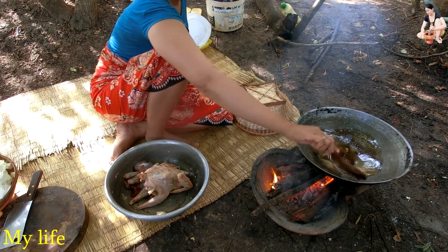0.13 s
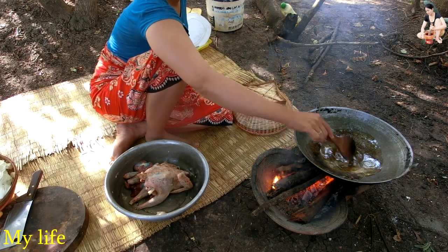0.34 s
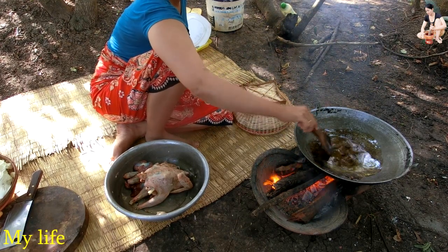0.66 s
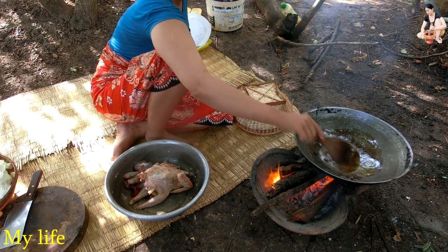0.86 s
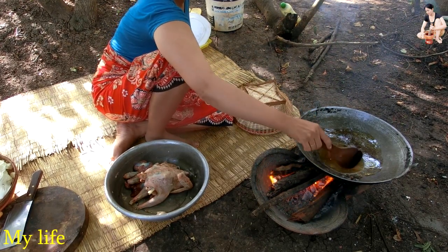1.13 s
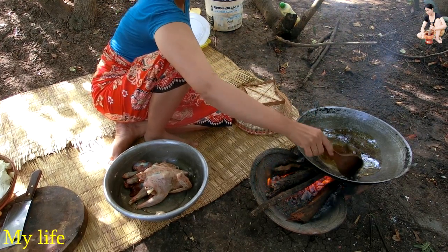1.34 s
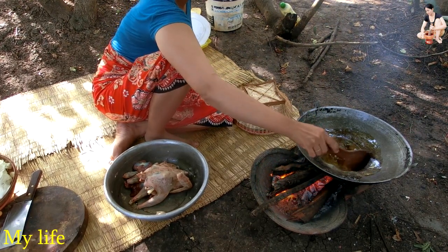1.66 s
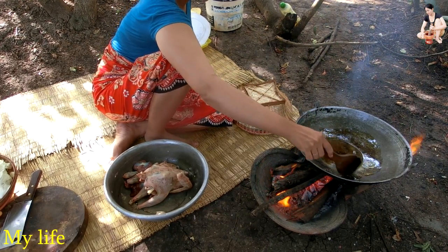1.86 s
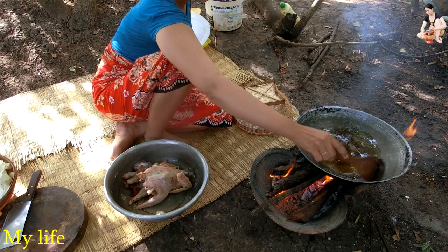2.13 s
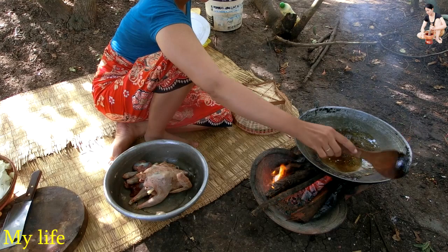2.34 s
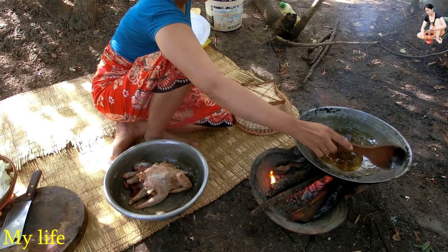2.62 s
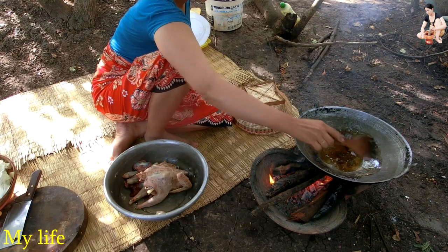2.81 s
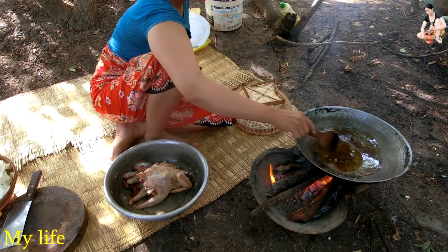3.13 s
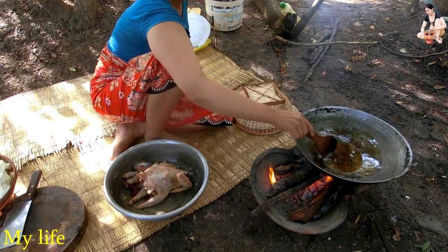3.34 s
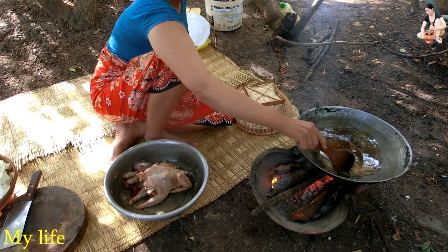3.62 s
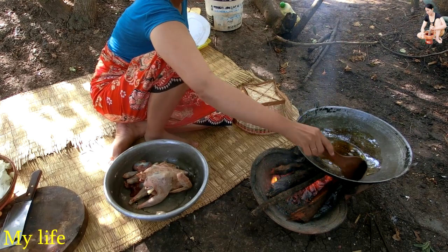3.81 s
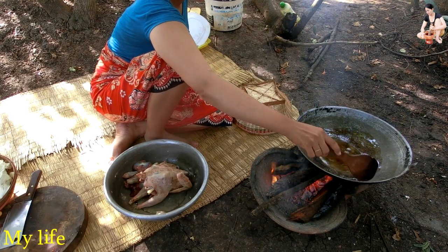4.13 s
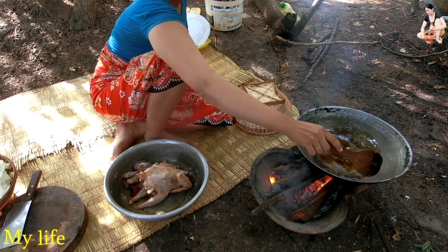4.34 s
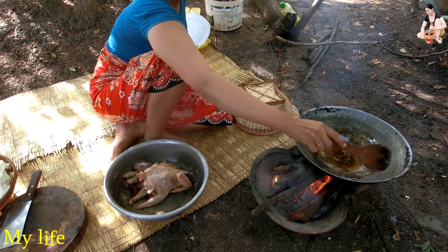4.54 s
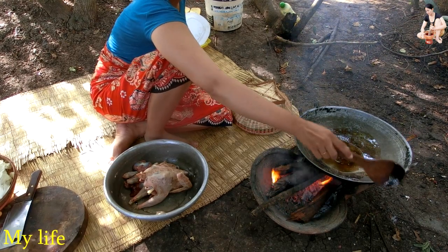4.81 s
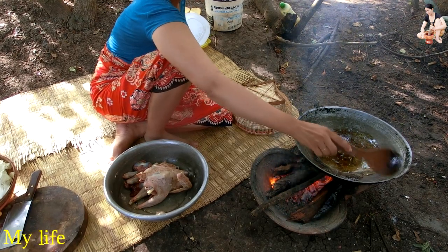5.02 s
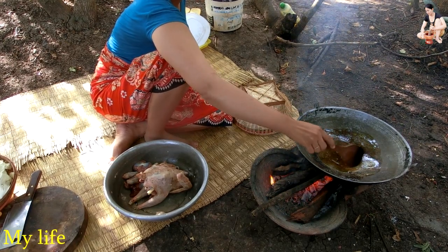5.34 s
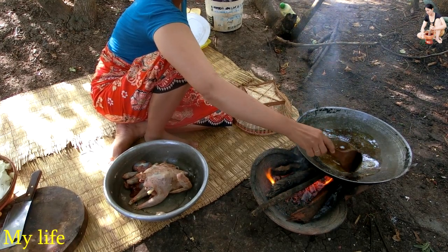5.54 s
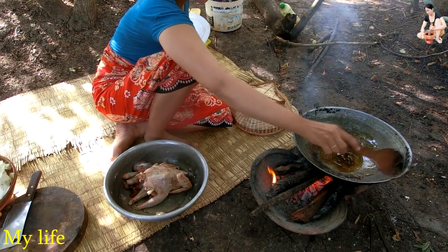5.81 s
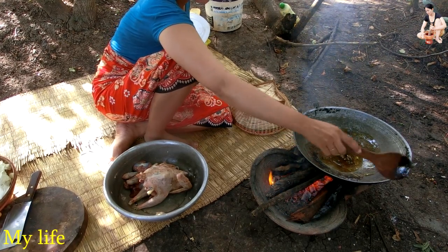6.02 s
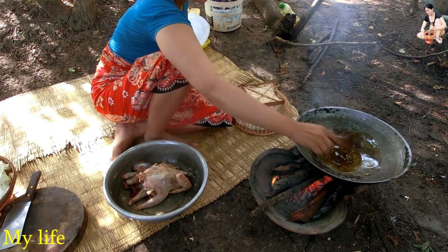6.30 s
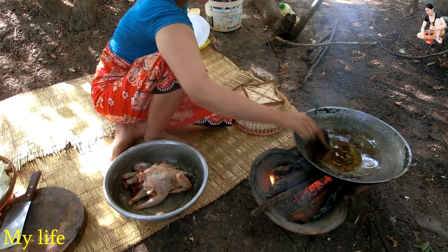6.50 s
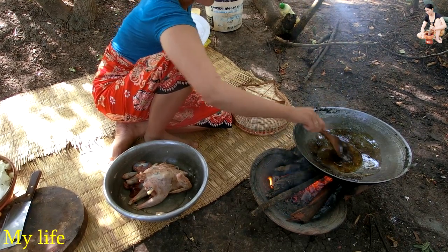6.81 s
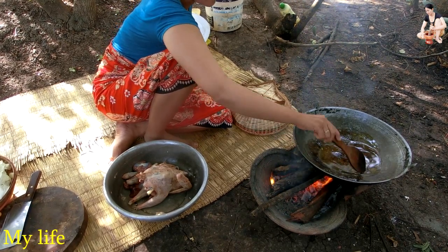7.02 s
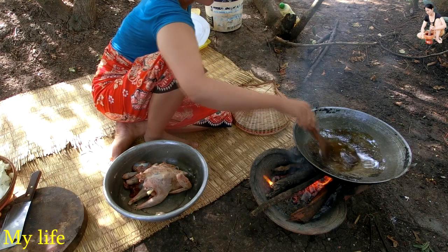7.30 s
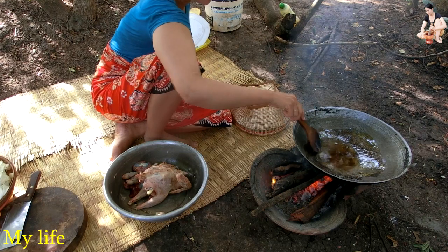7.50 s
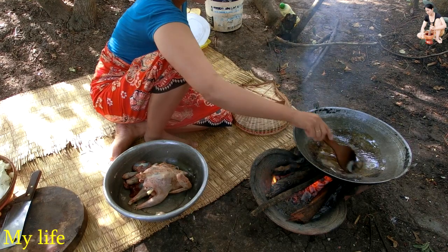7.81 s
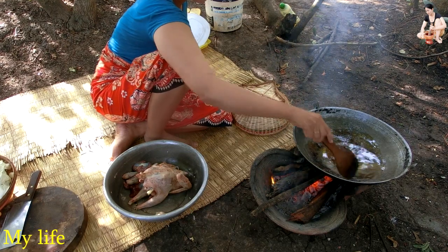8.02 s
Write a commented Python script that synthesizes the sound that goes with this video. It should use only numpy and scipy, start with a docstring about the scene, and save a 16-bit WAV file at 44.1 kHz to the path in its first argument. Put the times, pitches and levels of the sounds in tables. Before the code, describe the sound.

Close stereo pickup of hot oil spitting in a thin metal wok outdoors. After a quiet start, sharp bubble pops quickly become dense, each ringing the metal briefly, with fine sizzle and steam hiss. Wood fire snaps now and then, and a wooden spoon knocks and scrapes faintly. Near seven seconds the frying drops away, leaving sparse small pops over soft air.

```python
"""Steam bubbles burst in hot oil as wet food is stirred in a metal wok: each large pop and the fine
sizzle of tiny bubbles is made of short dying tones, which then ring the wok's many modes.
Shaped noise makes the steam's hiss. The wood fire snaps with cracks and short noise bursts, and a
wooden spoon knocks and scrapes with short tones. Soft air hiss and lumpy wind lie underneath,
outdoors, heard by two closely spaced microphones."""
import sys
import numpy as np
from scipy import signal
from scipy.fft import rfft, irfft
from scipy.io import wavfile
from scipy.ndimage import uniform_filter1d, map_coordinates

SR = 44100
rng = np.random.default_rng(int(sys.argv[2]) if len(sys.argv) > 2 else 0)


def transcribe(u):
    """Save the signal u as a 16-bit wav file named by the first command-line argument.

    u: samples, shape (n,) or (channels, n), limited to [-1, 1]; the rate is SR.
    q: integer samples, one column per channel.
    """
    v = np.clip(np.atleast_2d(u).T, -1, 1)
    q = np.round(v * 32767).astype(np.int16)
    wavfile.write(sys.argv[1], SR, q)


N = 359415  # length of the scene [samples]
PLACES = 6  # spots in the wok where bubbles burst
EDGE_HZ = 16000  # top of the recorder's band
AIR_DB, WIND_DB = -61.5, -77  # air hiss; steady wind before each microphone's own gain
KNOCK_T60_S = 0.014  # time for the main knock tone to fall by 60 dB

# All levels in the tables are relative; they set the balance within a layer.
# larger steam bubbles bursting, and one ring of the wok when the spoon knocks it (7.488 s):
# (time [s], level [dB], pitch [Hz])
BURSTS_AND_RING = [(0.2778, -33, 6800), (0.401, -26, 8870), (0.42, -34, 5250), (0.4444, -23.5, 5780),
                   (0.5127, -23, 4720), (0.585, -27, 9300), (0.61, -36.5, 2470), (0.627, -25.5, 8070),
                   (0.6413, -20.5, 4160), (0.6624, -21.5, 3350), (0.7125, -24, 6000), (0.7713, -27.5, 4680),
                   (0.897, -32, 4600), (1.0336, -28, 8340), (1.0834, -27, 4330), (1.1273, -25.5, 3970),
                   (1.1493, -26, 5140), (1.2184, -32, 5570), (1.302, -32.5, 5500), (1.3305, -31, 3860),
                   (1.369, -34, 5300), (1.4399, -28.5, 5250), (1.479, -23.5, 5700), (1.627, -25, 7900),
                   (1.6432, -19, 4450), (1.7, -29, 1800), (1.7368, -21, 4130), (1.798, -25, 5620),
                   (1.87, -26.5, 7700), (1.8921, -21.5, 3850), (1.925, -37, 1680), (1.932, -25, 5750),
                   (1.9823, -22, 5320), (2.0286, -22, 4600), (2.0583, -25, 4170), (2.068, -27, 7040),
                   (2.1628, -27, 5170), (2.2014, -26, 3600), (2.2575, -26, 6750), (2.316, -24.5, 3600),
                   (2.366, -21, 1980), (2.4628, -23.5, 4570), (2.5095, -25.5, 4250), (2.5311, -17.5, 2420),
                   (2.6029, -22.5, 4600), (2.6679, -20, 4930), (2.693, -20.5, 3700), (2.7703, -28, 3550),
                   (2.8046, -25.5, 6570), (2.828, -23, 1600), (2.8658, -29, 3130), (2.8999, -30.5, 3750),
                   (2.9393, -24, 3260), (2.9592, -25.5, 5270), (2.9739, -19.5, 5060), (3.039, -22.5, 3940),
                   (3.0978, -23, 5020), (3.1859, -23.5, 3620), (3.2945, -29, 6340), (3.3142, -19.5, 3580),
                   (3.382, -26.5, 3240), (3.4067, -21, 3230), (3.478, -29, 4630), (3.5413, -21, 3780),
                   (3.6004, -23.5, 4050), (3.68, -25, 5000), (3.8226, -29, 2640), (3.9226, -22.5, 3560),
                   (3.9838, -26, 4650), (4.007, -24, 4300), (4.0957, -25, 3650), (4.143, -20.5, 3370),
                   (4.3196, -27, 4020), (4.3451, -24, 5570), (4.4998, -24, 5600), (4.5616, -28.5, 5140),
                   (4.6339, -17, 3740), (4.6684, -27, 3870), (4.6874, -16.5, 3900), (4.731, -26.5, 3900),
                   (4.8207, -23, 4860), (4.8958, -23, 4340), (4.9077, -21.5, 4900), (4.9555, -24.5, 6560),
                   (5.005, -25, 2450), (5.0235, -28, 4000), (5.1053, -27.5, 4660), (5.1444, -20.5, 3770),
                   (5.221, -22.5, 2130), (5.2505, -24.5, 2440), (5.2892, -31, 3500), (5.3501, -29, 3800),
                   (5.3985, -25.5, 6500), (5.4201, -22, 4670), (5.475, -29.5, 4070), (5.5552, -23.5, 5170),
                   (5.6176, -22, 3650), (5.7456, -21.5, 4700), (5.7731, -17, 3730), (5.8197, -20.5, 5100),
                   (5.8715, -26.5, 2100), (5.9613, -27.5, 4720), (5.9798, -26.5, 4800), (6.005, -26, 3860),
                   (6.0556, -25.5, 2680), (6.099, -21, 2050), (6.1851, -22.5, 5120), (6.2537, -25.5, 4240),
                   (6.316, -27, 3820), (6.3633, -31, 5000), (6.3942, -26.5, 6200), (6.428, -26.5, 7100),
                   (6.487, -23, 8000), (6.525, -21, 2180), (6.5847, -24.5, 6350), (6.7442, -28.5, 4730),
                   (6.752, -30, 1930), (6.782, -26.5, 5140), (6.8913, -41, 3700), (6.9846, -35, 4740),
                   (7.0782, -34.5, 5900), (7.1259, -47, 5170), (7.1438, -40, 7400), (7.2025, -40, 3900),
                   (7.488, -34, 1820), (7.67, -31.5, 5430), (7.7276, -30.5, 4600), (7.8044, -32.5, 3240),
                   (7.8485, -27, 1440), (7.8493, -24, 3540), (7.96, -30.5, 5580), (7.998, -27, 5700)]
# dry snaps of burning wood, and one bright high bubble pop (3.8486 s): (time [s], level [dB])
SNAPS_AND_BRIGHT_POP = [(0.2409, -28.5), (3.258, -19), (3.3782, -31), (3.8486, -27.5), (7.316, -31.5),
                        (7.445, -43), (7.4634, -31), (7.812, -35.5)]
# wooden spoon knocking on the wok: # (time [s], level [dB], pitch [Hz])
KNOCKS = [(1.9, -33.5, 527), (3.333, -30, 520), (6.563, -35, 467), (7.49, -36.5, 477),
          (7.812, -45, 600)]
# tiny bubbles, strength over time: (time [s], level [dB])
SIZZLE_LEVEL = [(0.0, -39), (.35, -53), (.6, -46), (1.82, -40.5), (3.3, -39), (4.42, -42.5), (5.0, -41),
                (5.92, -39.5), (6.6, -42.5), (7.15, -40.5), (7.3, -63.5), (7.7, -47.5), (8.15, -58.5)]
# tiny bubbles, strength by pitch: (pitch [Hz], level [dB])
SIZZLE_COLOUR = [(2600, 0.5), (8000, 0.5), (15000, -13)]
# lowest modes of the wok: (pitch [Hz], level [dB], time to fall by 60 dB [s])
WOK_LOW_MODES = [(1238, -9.5, 0.19), (1374, -8, 0.15), (2089, -12.5, 0.087), (2203, -11, 0.092),
                 (2440, -5.5, 0.059), (2683, -4, 0.039)]
# crowd of upper wok modes: (pitch [Hz], level [dB])
WOK_UPPER_MODES = [(2800, -21.5), (3600, -16), (8000, -22), (15000, -20.5)]
# loudest low mode, moved by the load of oil, food and spoon: (time [s], pitch [Hz])
LOADED_PITCH = [(.4, 1670), (1.5, 1582), (2.4, 1626), (5.201, 1610), (6.6, 1613), (7.0, 1534), (7.86, 1505)]
# colour of still air and fire: (frequency [Hz], level [dB per Hz])
AIR_COLOUR = [(35, -15), (60, 2.5), (398, 5.5), (732, 5), (1600, 0.5), (14200, -2), (16000, -10)]
# spoon dragged along the wok, and one faint low tone (5.877 s):
# (middle [s], length [s], level in wood [dB], level in wok [dB])
SCRAPES_AND_TONE = [(2.232, 0.15, -52, -65.5), (5.877, 0.31, -64, -86), (6.967, 0.24, -65.5, -68),
                    (7.68, 0.23, -70.5, -75.5)]
# puffs of wind: (middle [s], length [s], level [dB])
WIND_GUSTS = [(1.33, 0.26, -63), (3.63, 0.19, -60.5), (3.83, 0.12, -52.5), (4.31, 0.045, -52.5)]


def amp(db):
    """Turns dB into gain."""
    return 10 ** (np.asarray(db) / 20)


def evened(x):
    """Scales a signal to an rms (average strength) of 1."""
    return x / np.sqrt(np.mean(x ** 2) + 1e-20)


def read(table, hz):
    """Looks up a (frequency, value) table along a log frequency axis."""
    f, value = np.transpose(table)
    return np.interp(np.log(hz + 1), np.log(f + 1), value)


def curve(rows):
    """Turns (time, dB) points into a gain for every sample."""
    s, db = np.transpose(rows)
    return amp(np.interp(np.arange(N) / SR, s, db))


def swell(rows):
    """Adds up smooth humps of gain from rows of (middle, length, dB)."""
    t = np.arange(N) / SR
    return sum(amp(db) * np.exp(-8 * ((t - s) / length) ** 2) for s, length, db in rows)


def coloured(x, spectrum):
    """Shapes the frequencies of a sound by a (Hz, dB) table."""
    hz = np.fft.rfftfreq(x.shape[-1], 1 / SR)
    return irfft(rfft(x) * amp(read(spectrum, hz)), x.shape[-1])


def thin(x, hz):
    """Takes out the bass, which small things cannot send out."""
    return signal.sosfilt(signal.butter(4, hz, "high", fs=SR, output="sos"), x)


def add(mix, s, sound):
    """Lays a sound into the mix at s seconds."""
    part = mix[round(s * SR):][:len(sound)]
    part += sound[:len(part)]


def ring(t, hz, t60):
    """A sine that falls by 60 dB in t60 seconds."""
    return amp(-60 * t / t60) * np.sin(2 * np.pi * hz * t)


def clicks(count, per_s, spread_db):
    """Clicks at random times with random signs; a wider spread makes a few stand out more."""
    size = amp(spread_db * np.minimum(rng.exponential(1, count), 4))
    sign = rng.choice([-1., 1.], count)
    return size * sign * (rng.random(count) < per_s / SR)


def air():
    """Soft even hiss, partly alike at both microphones, and lumpy wind of its own at each."""
    a, b = rng.standard_normal((2, N))
    partly_alike = np.array([a, 0.47 * a + 0.84 * b])
    hiss = amp(AIR_DB) * evened(coloured(partly_alike, AIR_COLOUR))
    lumps = amp(5.4 * evened(uniform_filter1d(rng.standard_normal((2, N)), 2000)))
    low = signal.butter(2, 110, fs=SR, output="sos")
    wind = evened(signal.sosfilt(low, lumps * rng.standard_normal((2, N))))
    strength = amp(WIND_DB) + swell(WIND_GUSTS)
    return hiss + strength * wind * amp([[4], [-1]])  # left, right [dB]


def fire():
    """A snap is one sharp crack; the ground returns it as a short bright burst. One bright pop joins in."""
    out, t = np.zeros(N), np.arange(2000) / SR
    for s, db in SNAPS_AND_BRIGHT_POP:
        crack = 4.4 * ring(t, 11600, 0.00084)
        noise = np.diff(rng.standard_normal(len(t) + 1))  # differences sound bright
        # the burst swells for 6 ms, then fades more slowly
        fade_s = np.where(t < .006, .02, .07)
        burst = noise * amp(-9.5 - 60 * abs(t - .006) / fade_s)
        add(out, s, amp(db) * (crack + burst))
    return out


def spoon():
    """Dull knocks of wood; uneven slips ring wood for scrapes and one faint tone."""
    out, t = np.zeros(N), np.arange(4000) / SR
    for s, db, hz in KNOCKS:
        main = ring(t, hz, KNOCK_T60_S)
        lower = 0.29 * ring(t, 0.65 * hz, 2 * KNOCK_T60_S)
        add(out, s, amp(db) * (main + lower))
    slips = evened(clicks(N, per_s=400, spread_db=0.5))
    slips = slips * swell([row[:3] for row in SCRAPES_AND_TONE])
    wood = ring(t, 504, 0.0093) + 0.21 * ring(t, 365, 0.081) + 0.7 * ring(t, 990, 0.0076)
    return out + signal.oaconvolve(slips, wood / np.linalg.norm(wood))[:N]


def rasp():
    """Dense slips on the metal, as dulled clicks, drive the wok in each scrape and the faint low tone."""
    slips = clicks(N, per_s=1800, spread_db=5.5)
    dull = signal.sosfilt(signal.butter(1, 1700, fs=SR, output="sos"), slips)
    return evened(dull) * swell([(s, length, db) for s, length, _, db in SCRAPES_AND_TONE])


def steam(crackle, db=-54.5, hold_s=0.0081):
    """Escaping steam hisses in grains after the bursts, with separate noise at each microphone."""
    keep = np.exp(-1 / (hold_s * SR))
    power = (crackle ** 2).mean(0)
    level = signal.lfilter([1 - keep], [1, -keep], power) ** 0.37  # follows the crackle, then lingers
    grains = amp(4.5 * evened(uniform_filter1d(rng.standard_normal(N), size=260)))
    noise = thin(rng.standard_normal((2, N)), 1600) * amp([[1], [-1]])
    return amp(db) * evened(level * grains * noise)


def loaded(blows, ring_db=-25, t60=0.1):
    """A close pair of modes follows the load and wavers as the oil sloshes; places drive them unequally."""
    out, r = 0, amp(-60 / t60 / SR)
    pitch = np.interp(np.arange(N) / SR, *np.transpose(LOADED_PITCH))
    for ratio in (1, 0.96):
        slosh = 1 + 0.02 * evened(uniform_filter1d(rng.standard_normal(N), size=5000))
        turn = np.exp(2j * np.pi * np.cumsum(ratio * slosh * pitch) / SR)
        drive = amp(rng.normal(2, 3, PLACES)) @ blows
        # a decaying resonator whose pitch moves along with turn
        out = out + (turn * signal.lfilter([1], [1, -r], drive / turn)).imag
    return amp(ring_db) * out


def wok(blows, ring_db=-22.5):
    """Each place favours other modes; high modes reach the two microphones with unlike phase."""
    t = np.arange(4500)[:, None] / SR
    top_hz = rng.uniform(2800, 15800, size=600)  # a thin shell has evenly dense modes
    twins = [(f * 1.01, db, t60) for f, db, t60 in WOK_LOW_MODES]  # each low mode has a near twin
    low_hz, low_db, low_t60 = np.transpose(WOK_LOW_MODES + twins)
    hz = np.r_[low_hz, top_hz]
    db = np.r_[low_db, read(WOK_UPPER_MODES, top_hz)]
    t60 = np.r_[low_t60, .07 * (3500 / top_hz) ** .3]
    # every mode as a dying complex tone
    turning = np.exp(db * np.log(10) / 20 + (2j * np.pi * hz - np.log(1000) / t60) * t)
    chance = rng.standard_normal((3, PLACES, len(hz)))
    share = amp(3.5 * chance[0]) * np.sign(chance[1])
    skew = np.exp(1j * chance[2] * hz / 6000)  # left microphone's phase
    both = np.array([turning @ (share * skew).T, turning @ share.T])
    response = amp(ring_db) * both.imag.transpose(0, 2, 1)  # microphone, place, time
    response[:, :, 0] += 1.15  # the blow itself, heard directly
    return signal.oaconvolve(blows[None], response, axes=2).sum(1)[:, :N]


def bubbles(at, hz, gain, t60, count):
    """Many bubbles from start samples: dying cycles with a soft start; low-pitched ones hardly ring."""
    t = np.arange(160)[:, None] / SR
    start = np.minimum(t * hz / 1.6, 1)
    sound = gain * ring(t, hz, t60 * np.minimum(hz / 2600, 1) ** 2) * start
    when = at + np.arange(len(t))[:, None]
    return np.bincount(when.ravel(), sound.ravel(), count + len(t))[:count]


def pop(db, hz, count=24):
    """The skin tears with a tick, the bubble rings, and neighbours ever closer in size burst after it."""
    t = np.arange(30) / SR
    late, size, loud = rng.random((count, 3)).T
    late = late ** 1.5 * 2400  # delay of each neighbour [samples]
    gain = amp(-11.5 + 13.3 * (loud - 1.0) - 60 * late / SR / 0.44)
    pitch = hz * np.exp(0.84 * (size - .5) * (1 - late / late.max()))
    pitch = np.minimum(pitch, .36 * SR)
    at = np.r_[0, late.astype(int)]  # the main bubble comes first
    sound = bubbles(at, np.r_[hz, pitch], np.r_[1, gain], 0.004, count=2600)
    tick = amp(rng.normal(-5.0, 4.2)) * ring(t, 1.84 * hz, 0.00084)
    sound[:len(t)] += tick
    return amp(db) * sound


def oil(count=40000):
    """Large bursts (one row stands in for a spoon's ring), each flaring a sizzle of tiny bubbles, by place."""
    out, flare, t = np.zeros((PLACES, N)), np.zeros(N), np.arange(5000) / SR
    for k, (s, db, hz) in enumerate(BURSTS_AND_RING):
        add(out[k % PLACES], s, pop(db, hz))
        add(flare, s, amp(1.1 * (db + 22.5) - 60 * t / 0.23))
    when, size, loud = rng.random((count, 3)).T
    at = (when * N).astype(int)
    hz = 2400 + size * (15800 - 2400)
    # bubbles close in time and pitch share their strength: a grid of 5 ms by one step of pitch
    patches = uniform_filter1d(rng.standard_normal((N // 220 + 1, 32)), size=9)  # smooth over pitch
    patches = evened(signal.lfilter([1], [1, -0.8], patches, axis=0))  # smooth over time
    clumps = map_coordinates(patches, [at / 220, size * 31], order=1) * (0.4 + 0.6 * size)
    gain = evened(amp(7.0 * clumps - 5.0 * np.log(np.maximum(loud, .03))))
    strength = curve(SIZZLE_LEVEL) * (0.49 + flare)
    gain = gain * strength[at] * amp(read(SIZZLE_COLOUR, hz))
    for k in range(PLACES):
        mine = slice(k, None, PLACES)
        out[k] += bubbles(at[mine], hz[mine], gain[mine], 0.0014, count=N)
    return out


def microphones(x, lag_s=3.3e-5):
    """The left microphone is more sensitive and hears a little later."""
    hz = np.fft.rfftfreq(N, 1 / SR)
    delay = np.exp(-2j * np.pi * hz * np.array([[lag_s], [0]]))
    return irfft(rfft(x) * delay, N) * amp([[1.1], [-1.1]])


def scene():
    """Wok, fire and spoon reach both microphones; steam, air and wind lie under them."""
    blows = oil()
    blows[0] += rasp()
    crackle = thin(wok(blows) + loaded(blows), 1567)
    near = crackle + thin(fire(), 390) + thin(spoon(), 300)
    return microphones(near) + steam(crackle) + air()


def record(dry):
    """The recorder's band limit: a filter takes away the highest treble."""
    band = signal.firwin(255, EDGE_HZ, window=("kaiser", 9), fs=SR)
    return signal.oaconvolve(dry, band[None], "same")


dry = scene()
out = record(dry)
transcribe(out)
```